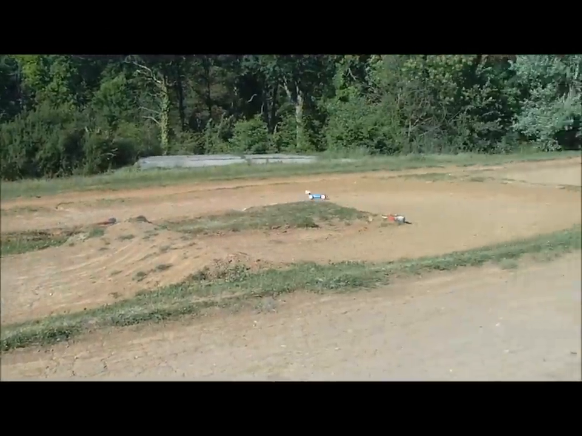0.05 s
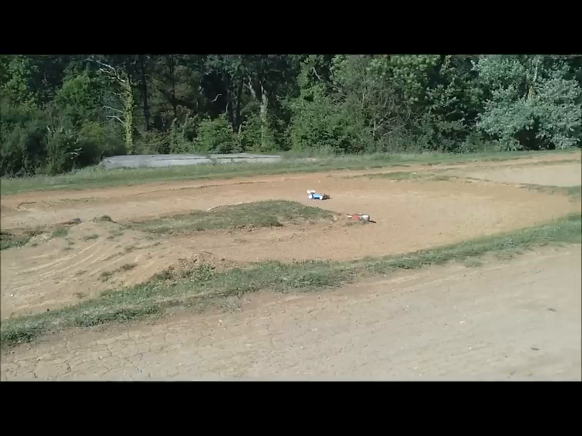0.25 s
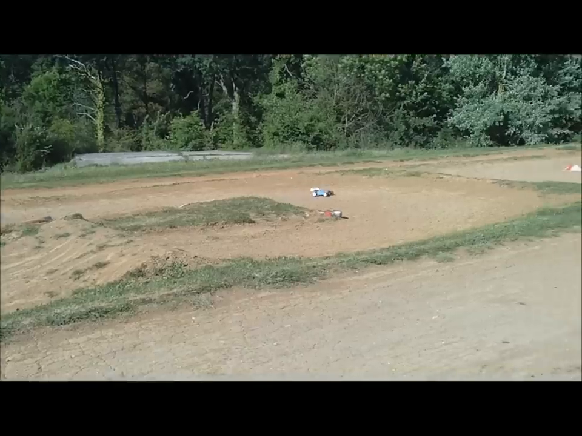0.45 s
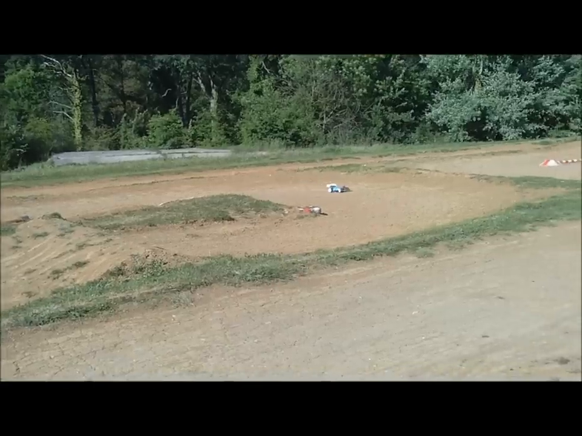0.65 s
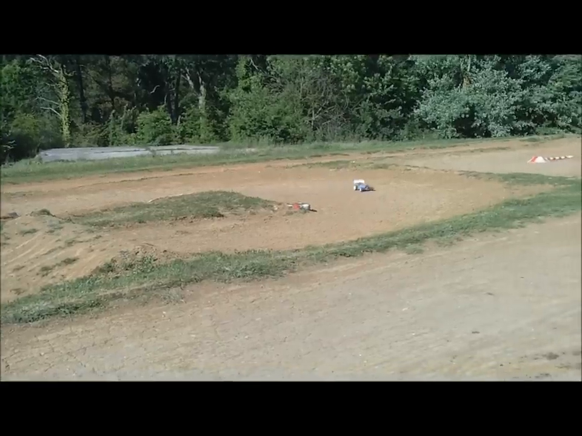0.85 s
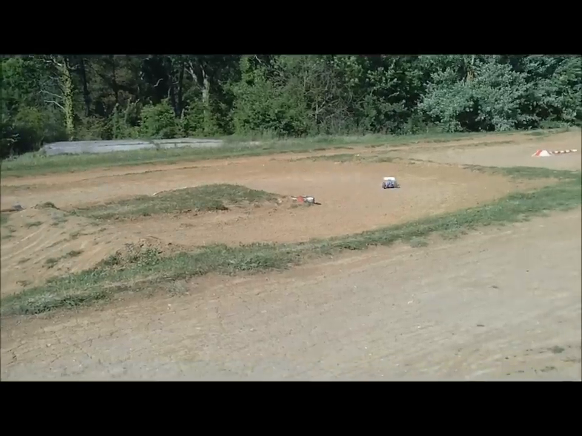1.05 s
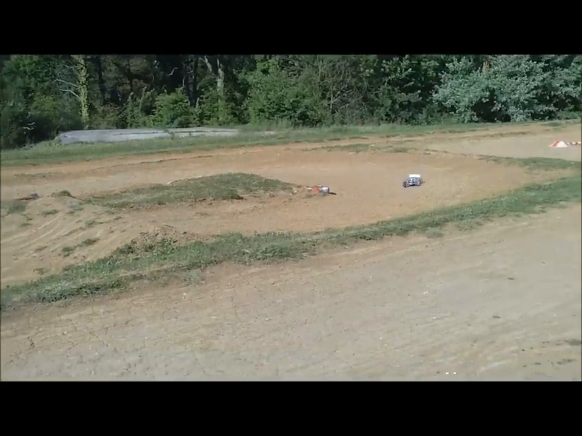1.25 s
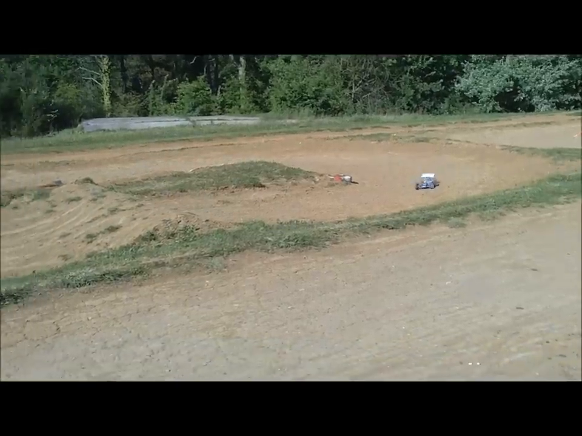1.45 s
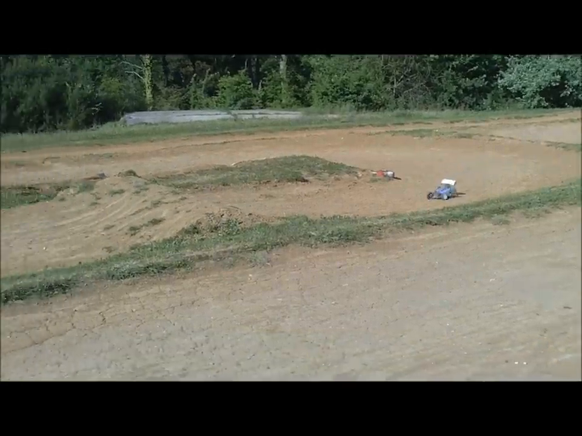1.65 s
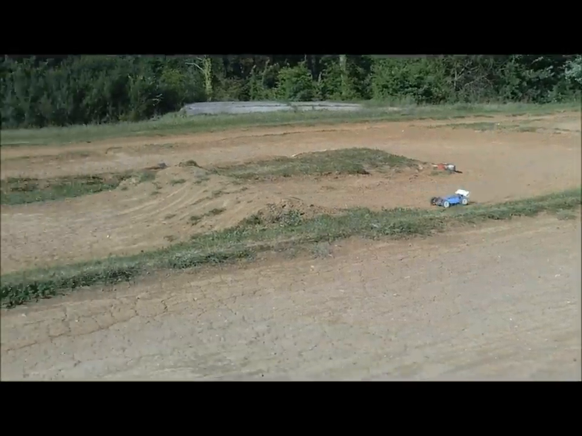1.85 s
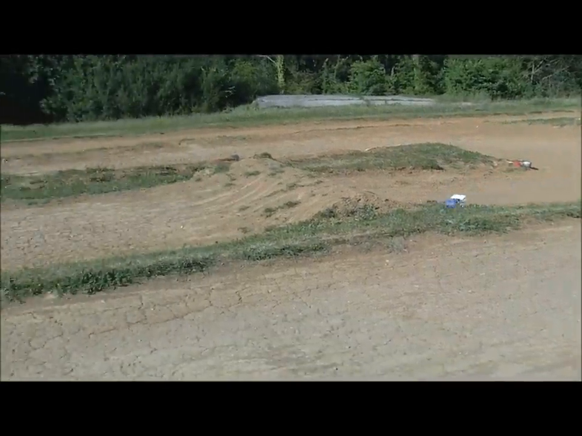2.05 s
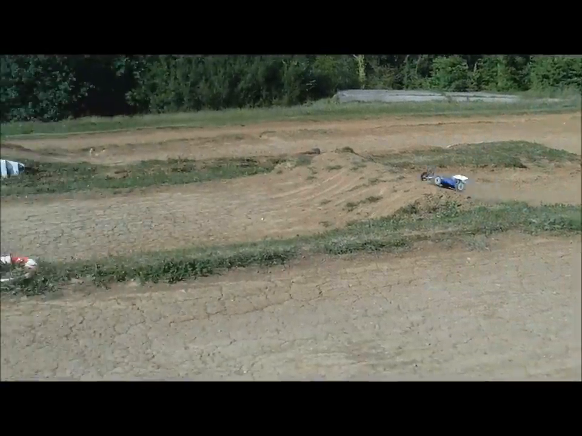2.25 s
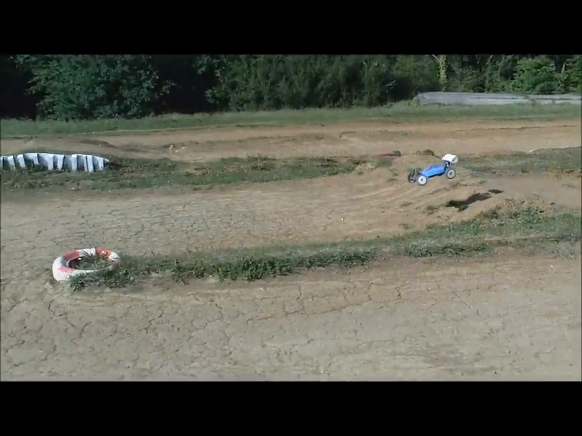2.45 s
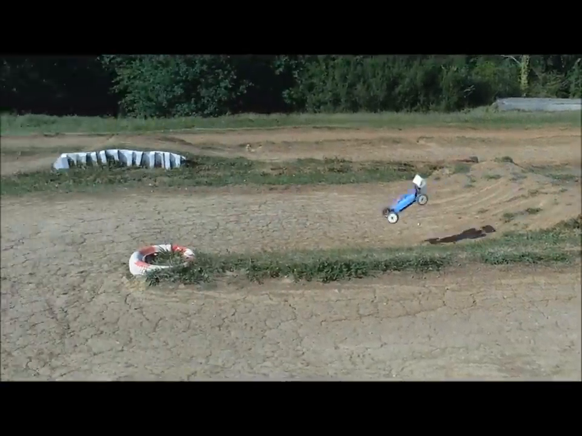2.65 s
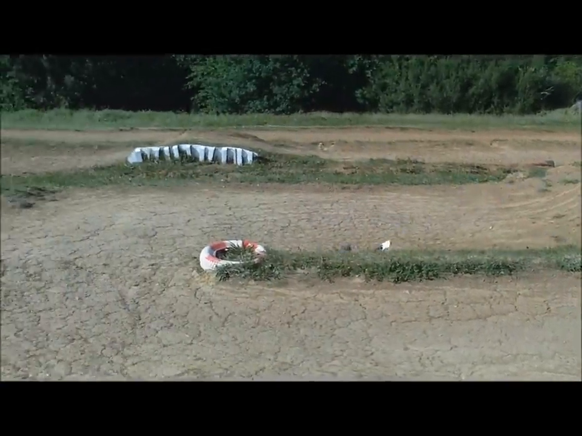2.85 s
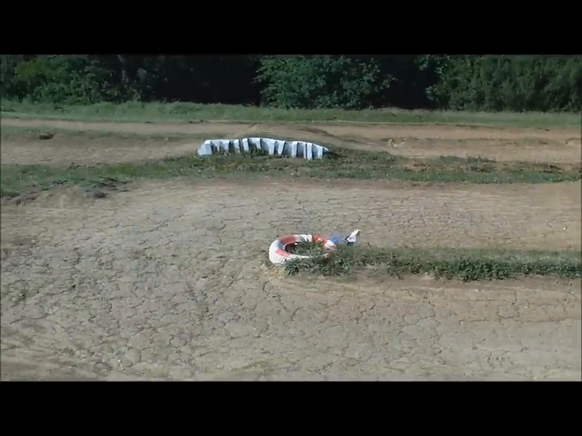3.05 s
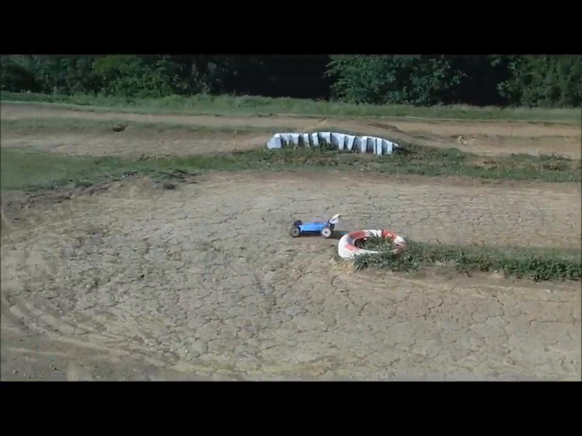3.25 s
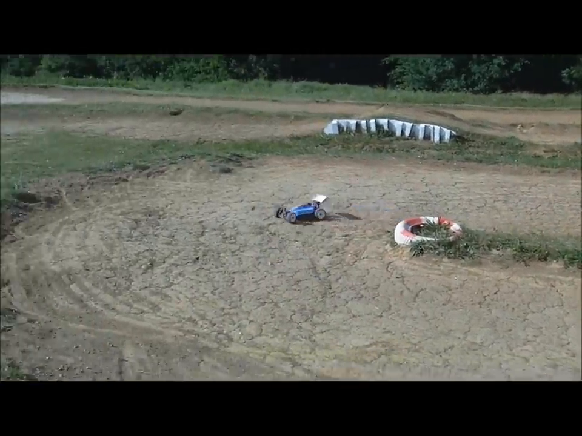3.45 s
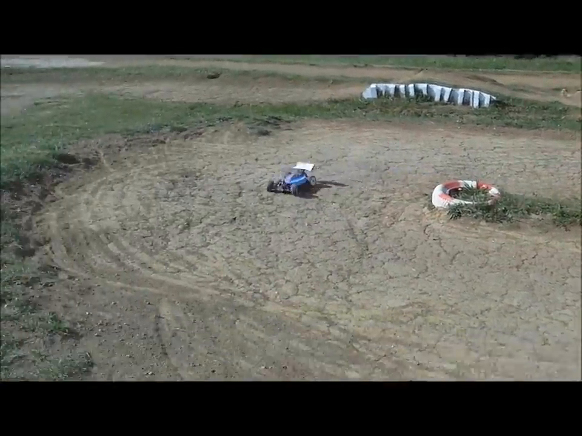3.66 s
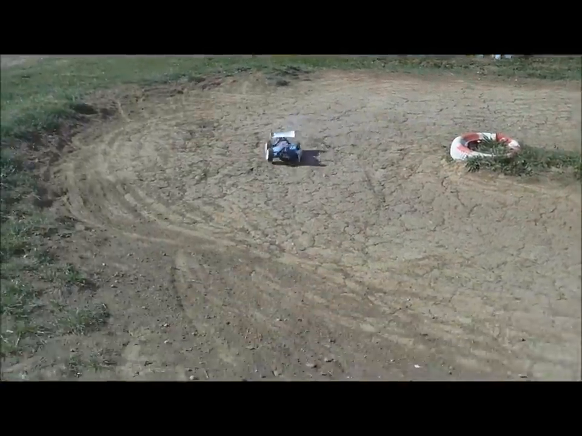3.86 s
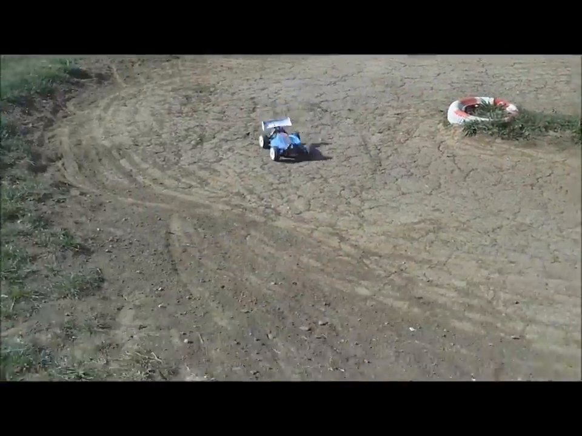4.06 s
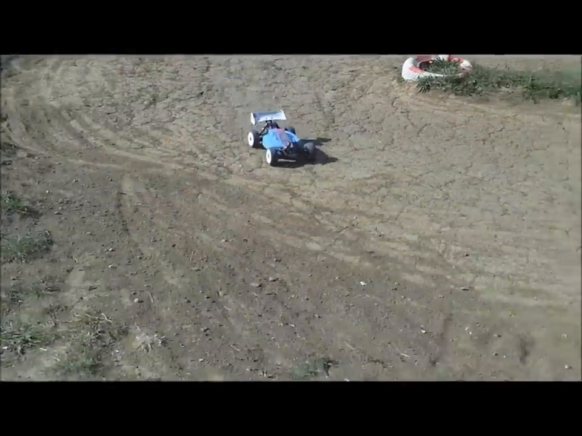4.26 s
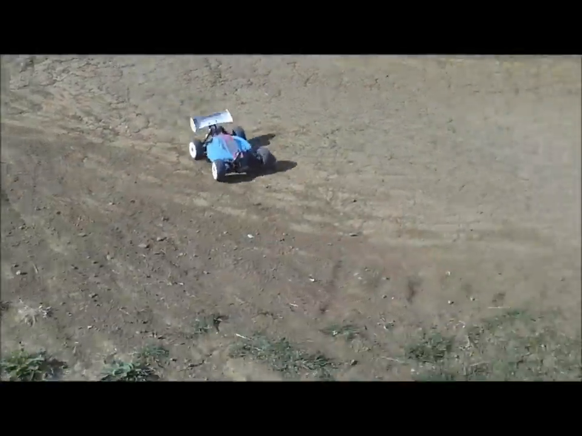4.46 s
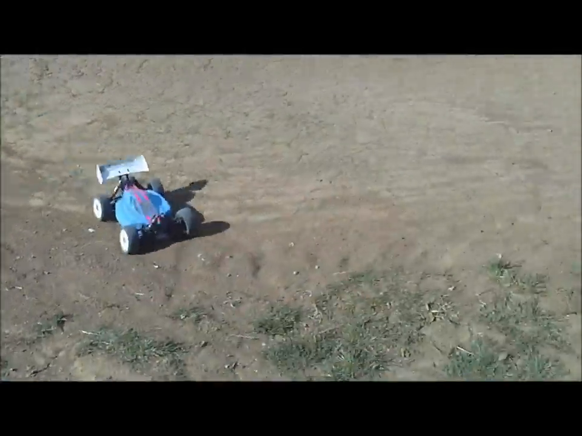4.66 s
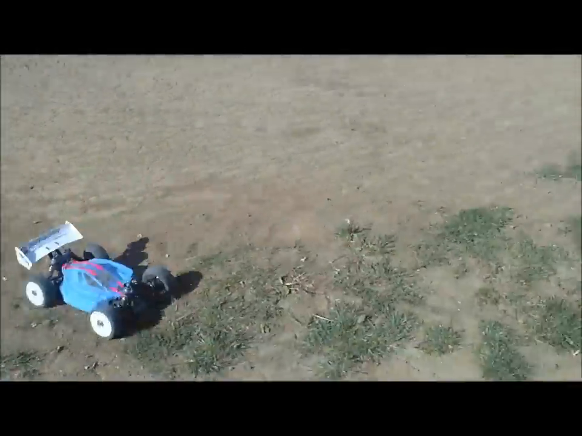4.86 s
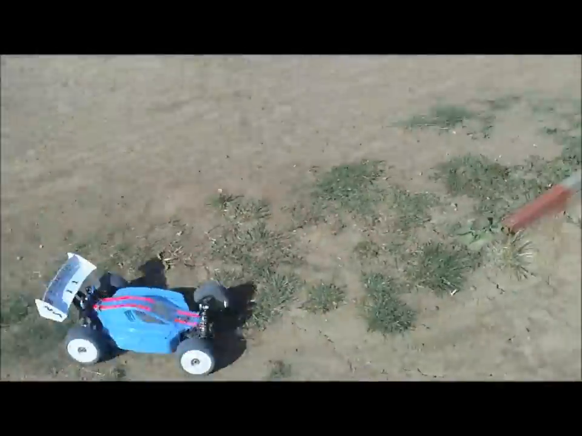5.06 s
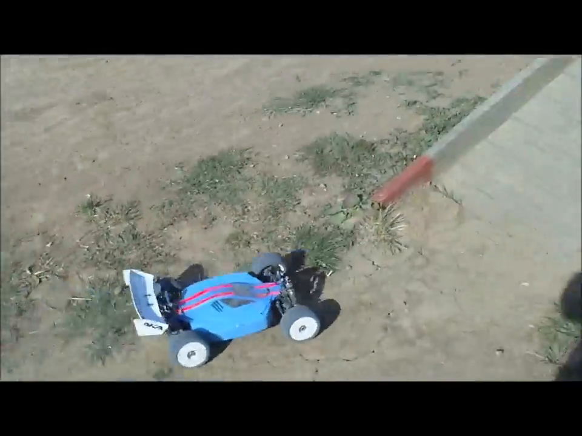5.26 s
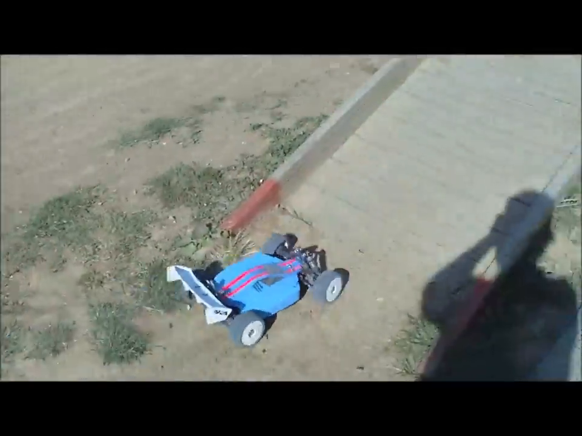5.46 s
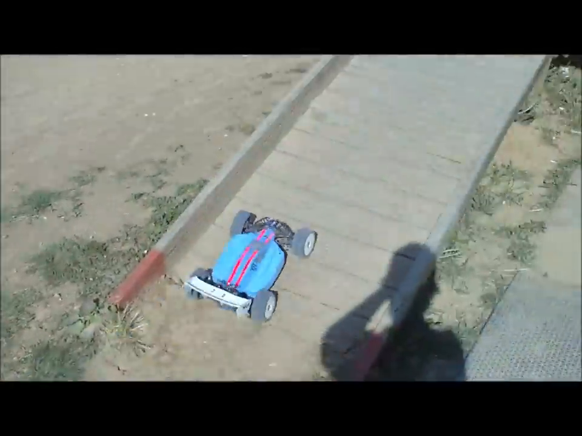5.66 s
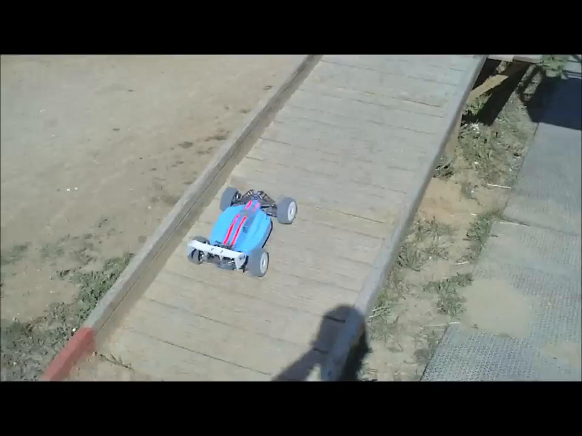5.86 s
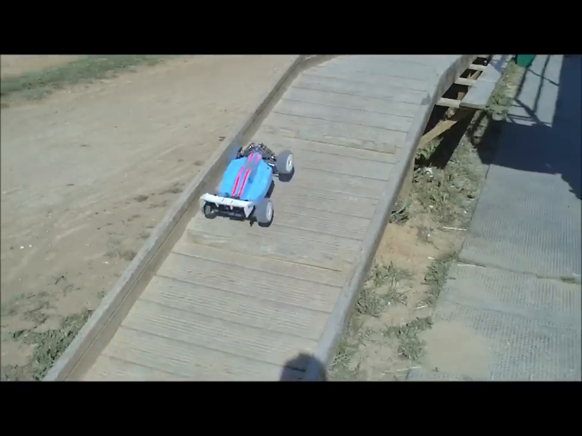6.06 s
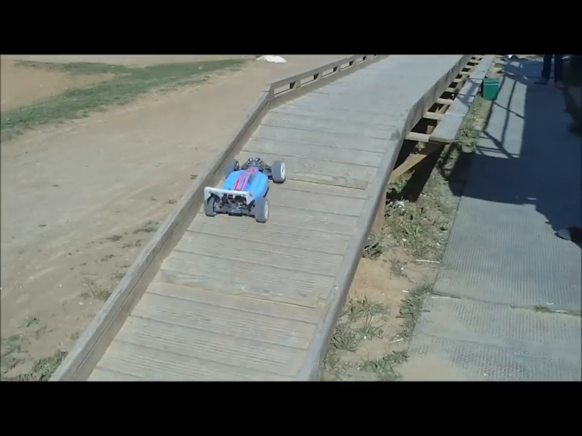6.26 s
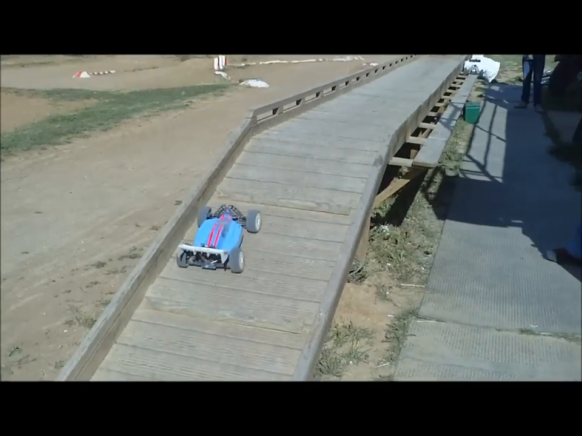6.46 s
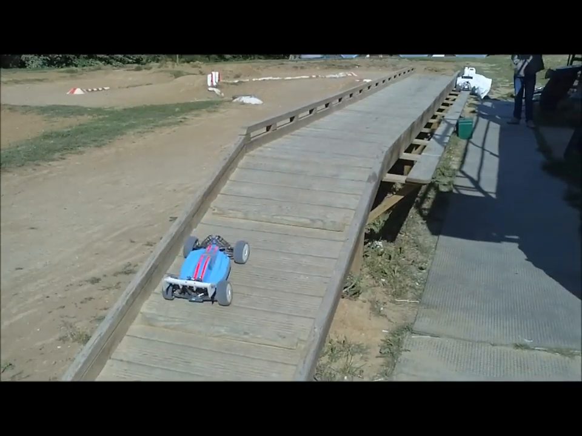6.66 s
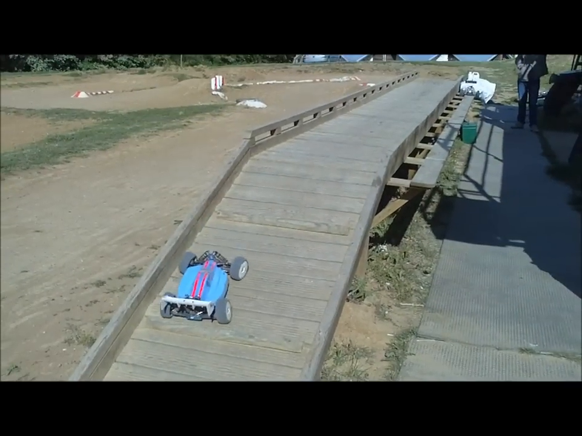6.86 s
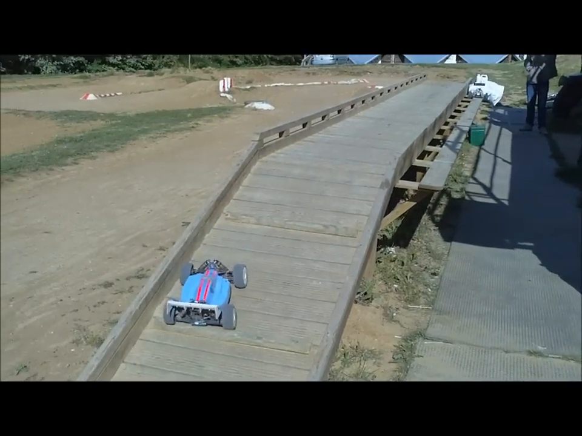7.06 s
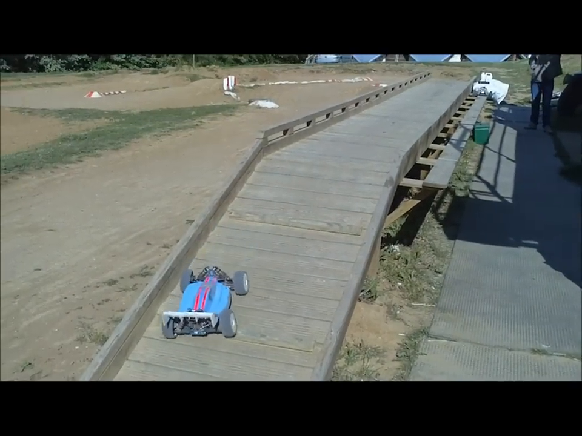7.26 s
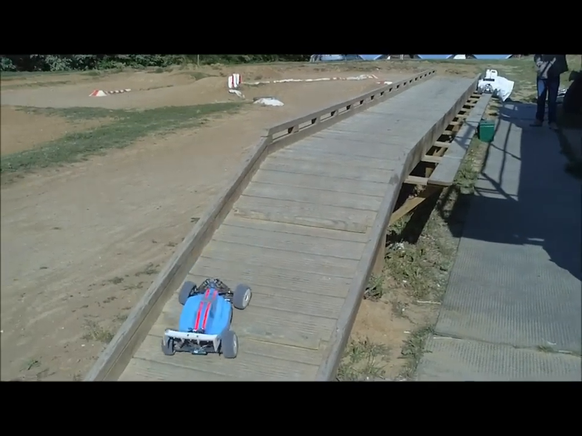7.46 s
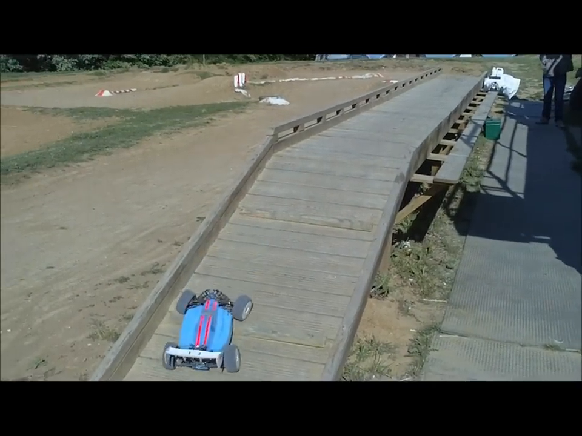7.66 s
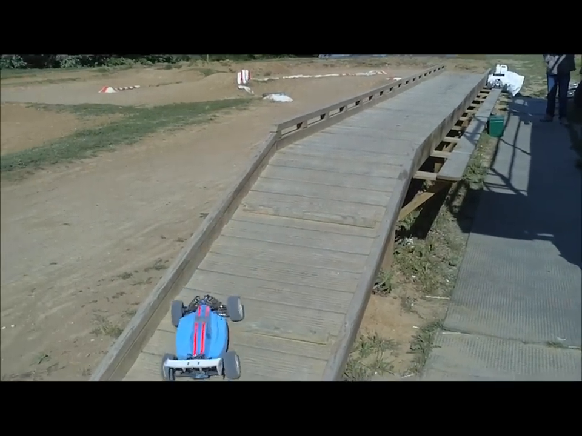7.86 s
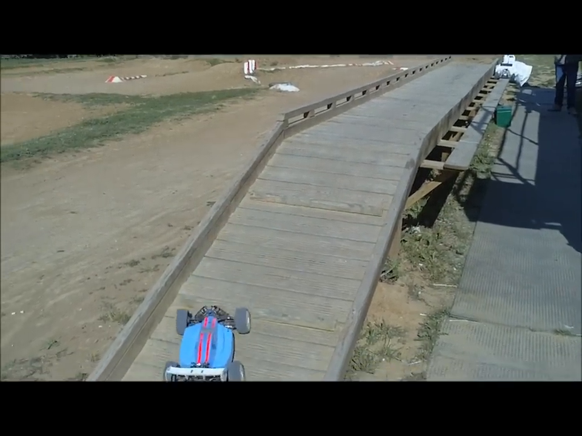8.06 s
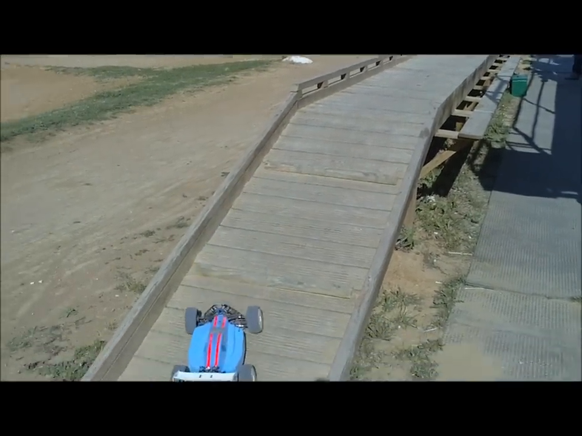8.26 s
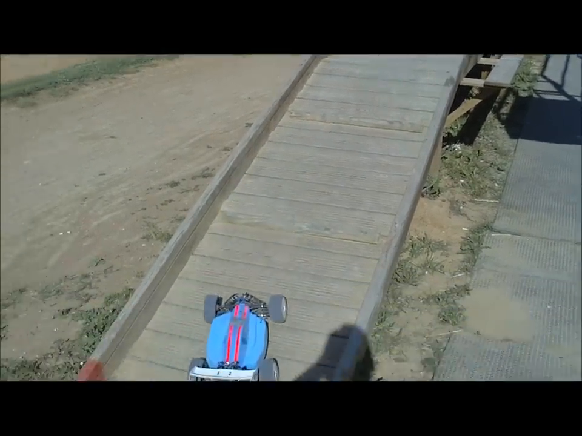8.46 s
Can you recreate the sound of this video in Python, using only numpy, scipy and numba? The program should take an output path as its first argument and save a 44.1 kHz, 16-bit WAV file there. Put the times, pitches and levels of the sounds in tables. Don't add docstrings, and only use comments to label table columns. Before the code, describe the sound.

Outdoors on a dirt track, a small electric toy buggy whines and chatters in short throttle bursts, faint at first, then nearer. Tyres patter on its hollow shell, landings thump, and loose drive parts rattle sharply as it passes close. It clacks hard up a plank ramp, goes quiet, then rolls back with a knock and light ticks. A thin camera microphone with little bass catches distant road hum and a breeze.

```python
import sys
import numpy as np
from scipy import signal
from scipy.fft import rfft, irfft, next_fast_len
from scipy.io import wavfile
from scipy.ndimage import uniform_filter1d, map_coordinates
from numba import njit

SR = 44100
rng = np.random.default_rng(int(sys.argv[2]) if len(sys.argv) > 2 else 0)


def volts_from_db(level):
    exponent = np.asarray(level, float) / 20
    return 10 ** exponent


def transcribe(u):
    v = np.clip(np.atleast_2d(u).T, -1, 1)
    q = np.round(v * 32767).astype(np.int16)
    wavfile.write(sys.argv[1], SR, q)


N = 375291

# [t/s, coasting gears level/dB, coasting shell level/dB, grit rasp re shell/dB]
COASTING = [(0, -59.5, -55, -4.5), (.85, -41.5, -56.5, -0.5), (1.7, -31, -42.5, -4),
            (1.95, -43, -37.5, -5.5), (2.5, -36, -50, 5.5), (3, -42.5, -42, 1), (3.5, -30.5, -35.5, -3.5),
            (4.1, -27.5, -35.5, -0.5), (4.4, -32.5, -38, -4), (4.7, -29, -35, -7), (5.3, -27.5, -34, -7),
            (5.8, -29, -32, -8), (6.3, -33.5, -39.5, -3.5), (7.25, -45, -42, -7.5), (7.75, -49, -43, -13),
            (8.51, -37, -47, -8)]


def level(x, db):
    return x * volts_from_db(db) / np.sqrt(np.mean(x ** 2))


def curves(table):
    s, *columns = np.transpose(table)
    return [np.interp(np.arange(N) / SR, s, c) for c in columns]


def colour(x, points):
    size = next_fast_len(N)
    hz, db = np.transpose(points)
    gain_db = np.interp(np.log(np.arange(size // 2 + 1) * SR / size + 1), np.log(hz), db)
    return irfft(rfft(x, size) * volts_from_db(gain_db), size)[:N]


def ring(x, hz, width_hz):
    return signal.lfilter(*signal.iirpeak(hz, hz / width_hz, fs=SR), x)


@njit
def moving_ring(x, hz, width_hz):
    y, band, low = np.empty(len(x)), 0., 0.
    for i in range(len(x)):
        g, k = np.tan(np.pi * hz[i] / SR), width_hz[i] / hz[i]
        v = (band + g * (x[i] - low)) / (1 + g * (g + k))
        band, low, y[i] = 2 * v - band, low + 2 * g * v, k * v
    return y


def walk(rate_hz):
    k = int(SR / rate_hz)
    return 0.92 * uniform_filter1d(np.repeat(rng.standard_normal(N // k + 1), k), k)[:N]


def clicks(per_s, scatter_db):
    hit = rng.random(N) < per_s / SR
    return hit * rng.standard_normal(N) * volts_from_db(scatter_db * np.minimum(rng.exponential(size=N), 3.5))


def late(x, ms):
    return map_coordinates(x, [np.arange(N) - ms * SR / 1000], order=1)


def swells(s, length_s, db, slope_db, rise_db_s, fall_db_s):
    hop = 32
    t = np.arange(0, N + 2 * hop, hop)[:, None] / SR - s
    held_db = db + slope_db * np.clip(t / length_s, 0, 1)
    event_db = held_db + rise_db_s * np.minimum(t, 0) - fall_db_s * np.maximum(t - length_s, 0)
    return np.interp(np.arange(N), np.arange(len(t)) * hop, volts_from_db(event_db.max(axis=1)))


def throttle():
    # [t/s, length/s, gear
    # chatter level/dB, swell over the blip/dB, shell drone re gears/dB]
    blips = [(0.179, 0.31, -37, 7.5, -9.5), (0.419, 0.085, -28, -4.5, -8.5),
             (0.534, 0.12, -32, 9.5, -14.5), (0.626, 0.17, -24.5, -3.5, -15),
             (0.859, 0.0089, -26.5, -11, -13), (0.922, 0.15, -29, 2, -13.5),
             (1.097, 0.19, -29.5, 6.5, -13.5), (1.29, 0.069, -25.5, 6.5, -12),
             (1.377, 0.15, -19.5, -7.5, -10), (1.54, .11, -26, 4, -12), (1.732, 0.23, -26.5, -14, -3),
             (2.066, 0.16, -39.5, 12, -4), (2.186, 0.15, -27, -5, -10), (2.43, 0.12, -34, -1, -10.5),
             (2.604, 0.053, -32.5, -0.5, -7.5), (2.698, 0.073, -24.5, 3.5, -12),
             (2.783, 0.17, -17, -7, -14), (3.107, 0.18, -39, 15, -12), (3.282, 0.16, -31.5, -1, -7.5),
             (3.46, 0.06, -23, -1, -11), (3.619, 0.062, -29.5, 11.5, -11.5),
             (3.699, 0.069, -17.5, -4, -10.5), (3.815, 0.26, -20.5, 3, -12.5),
             (4.159, 0.057, -23, 7, -11.5), (4.211, 0.11, -16.5, -5.5, -9),
                  (4.402, 0.027, -22, -3.5, -8), (4.475, 0.085, -18.5, 0, -11), (4.581, .3, -28, -3, -10),
                  (4.918, 0.035, -22.5, -2.5, -9), (5.064, 0.066, -24, 3, -10), (5.17, 0.12, -21, 1, -9),
                  (5.431, 0.087, -24, 0, -5), (5.616, 0.034, -24, 12, -11), (5.66, 0.13, -17, -2.5, -11),
                  (5.8, 0.054, -28, -1, -7), (5.865, 0.053, -21.5, 9, -11), (5.94, 0.2, -15.5, -7, -10),
                  (6.16, 0.091, -24, -1, -12), (6.274, 0.004, -13, -9, -19), (6.298, 0.091, -19.5, -10, -3),
                  (6.45, 0.081, -28.5, 3, -4), (6.549, 0.52, -29.5, -11, -3), (7.398, 0.11, -36.5, 6.5, 2),
                  (7.519, 0.197, -31, -5, 0.5), (7.8, 0.41, -36, -0.5, -1.5), (8.164, 0.28, -35, 3, -2.5),
                  (8.41, 0.37, -29, 6, -6.5)]
    s, length_s, gear_db, swell_db, shell_db = np.transpose(blips)
    bite_db_s, lift_db_s = 999, 598.5
    return [swells(s, length_s, gear_db + d, swell_db, bite_db_s, lift_db_s) for d in (0, shell_db)]


def gears(load):
    # [t/s, tooth rate f/Hz, whine re chatter/dB]
    mesh = [(0, 3630, -21), (.45, 5600, -16), (.7, 3500, -14), (1.05, 4100, -6), (1.35, 5810, -11.5),
            (2.1, 3570, -23), (3.0, 6150, -18), (3.3, 3800, -7.5), (3.83, 3900, -23), (3.94, 6900, -13),
            (4.25, 6580, -14), (4.75, 4830, -6.5), (5.45, 3464, -17.5), (6.3, 3820, -7.5), (6.6, 3060, -10),
            (7.45, 2740, -9), (8.36, 2870, -8), (8.51, 2900, -7)]
    # [f/Hz, width/Hz, level/dB]
    parts = [(2410, 300, -2), (2990, 256, 3.5), (3510, 550, 2), (4140, 330, 1.5), (4690, 220, 4),
             (4960, 210, 0.5), (5764, 530, 0.5), (6190, 280, 3), (6750, 340, -1)]
    # [f/Hz, density/dB per Hz]
    spectrum = [(880, -40), (1500, -10), (1740, -4.5), (2040, -8.5), (2310, -4.5), (3650, -1), (4340, -3),
                (6070, -3), (7150, -3.5), (7710, -15.5), (10000, -54), (17000, -120)]
    pinion_teeth, whine_width_hz = 24, 220.
    mesh_hz, whine_db = curves(mesh)
    turn = np.cos(2 * np.pi * np.cumsum(mesh_hz / pinion_teeth) / SR)
    teeth = clicks(per_s=9000., scatter_db=1.5) * (1 + 0.069 * turn)
    chatter = 1.4 * teeth
    for k, (hz, width_hz, db) in enumerate(parts):
        hits = np.roll(teeth, 500 * k)
        chatter = chatter + ring(hits, hz, width_hz) * volts_from_db(db + 4.03 * walk(40.))
    chatter = level(colour(chatter, spectrum), 0)
    wander_hz = mesh_hz * (1 + 0.022 * walk(55.))
    whine = moving_ring(rng.standard_normal(N), wander_hz, np.full(N, whine_width_hz))
    whine = level(whine, 0) * volts_from_db(whine_db + 3.75 * walk(30.))
    drive = np.hypot(load, volts_from_db(curves(COASTING)[0]))
    return (chatter + whine) * drive * volts_from_db(2.1 * walk(110.) - 1.9)


def sings():
    # [t/s, peak level/dB, f/Hz]
    tones = [(0.55, -35, 2930), (0.784, -28, 4240), (0.791, -24, 3490), (0.86, -32, 3450),
             (0.863, -42, 6480), (0.99, -29.5, 1630), (1.208, -23, 4250), (1.21, -26, 3050),
             (1.23, -27, 5000), (1.339, -21, 6500), (1.368, -16.5, 6200), (1.408, -29, 2980),
             (1.459, -23, 2990), (1.591, -27, 4980), (1.649, -28, 2960), (1.653, -24, 6360),
             (1.732, -25, 3030), (1.809, -27, 1490), (2.463, -27, 3580), (2.505, -39, 3630),
             (2.505, -26.5, 1465), (2.541, -27.5, 3050), (2.638, -29, 6030), (2.714, -29, 3100),
             (2.716, -24, 6750), (2.716, -36, 3720), (2.792, -20, 3600), (2.81, -28, 6130),
             (2.852, -17, 3540), (3.127, -31, 3000), (3.129, -27, 1500), (3.267, -34, 6300),
             (3.276, -21.5, 3760), (3.318, -24, 2990), (3.467, -33, 3960), (3.468, -23, 6280),
             (3.512, -25, 6140), (3.514, -24, 3270), (3.563, -27.5, 4640), (3.692, -22, 4600),
             (3.693, -23, 2390), (3.706, -21, 6200), (3.708, -26, 5800), (3.735, -26, 1520),
             (3.741, -19, 3070), (3.804, -26, 1640), (3.81, -28, 3120), (3.86, -17.5, 3060),
             (3.889, -21, 2940), (3.897, -17, 3720), (3.918, -21, 3070), (3.926, -17, 6130),
             (3.955, -18, 1720), (3.962, -16, 3140), (4.018, -16.5, 1700), (4.025, -20, 3240),
             (4.071, -23, 1690), (4.074, -17, 3140),
             (4.18, -20, 4920), (4.187, -23, 1780), (4.194, -20, 3320), (4.261, -25, 3190),
                  (4.267, -17, 6600), (4.288, -26, 3300), (4.414, -29, 3450), (4.49, -14, 5240),
                  (4.491, -17, 6300), (4.552, -16, 6180), (5.193, -16, 5900), (5.191, -19, 2300),
                  (5.191, -17.5, 4570), (5.194, -33, 3800), (5.217, -18, 2360), (5.239, -23, 2360),
                  (5.428, -24, 5780), (5.456, -17.5, 6700), (5.462, -17, 3380), (5.485, -27, 5650),
                  (5.512, -24, 3250), (5.625, -21, 5800), (5.647, -14, 5940), (5.654, -12, 3680),
                  (5.689, -15, 3760), (5.72, -14.5, 6430), (5.751, -22, 3610), (5.759, -23, 2900),
                  (5.772, -16, 3680), (5.774, -20, 5640), (5.776, -17, 2800), (5.823, -23, 2820),
                  (5.886, -18, 2780), (5.911, -21, 6680), (5.932, -12, 3630), (5.954, -22, 6150),
                  (5.954, -13, 4070), (5.971, -14, 5980), (5.98, -31, 2860), (5.991, -20, 3140),
                  (5.995, -16, 6750), (6.052, -16, 2820), (6.066, -17, 3820), (6.071, -14.5, 2990),
                  (6.189, -21, 4890), (6.303, -14, 3020), (6.319, -17, 4020), (6.389, -25, 3020),
                  (6.549, -36, 6360), (6.563, -26, 3150), (6.807, -32, 3200), (7.07, -35, 4150),
                  (7.526, -24, 2740), (7.576, -26, 2730), (7.632, -35, 2760), (7.693, -31, 2820),
                  (7.833, -33, 2800), (8.18, -37, 2850)]
    half_length_s, blur = 0.0036, 0.21
    out, t = np.zeros(N), np.arange(-1024, 1024) / SR
    rows = tones
    shakes = uniform_filter1d(rng.standard_normal((len(rows), len(t))), size=64, axis=1) * 8
    for (s, db, hz), shake in zip(rows, shakes):
        tone = np.sin(2 * np.pi * hz * t + 1.7 * blur * shake)
        tone = tone * (1 + blur * shake[::-1])
        i = int(s * SR) - len(t) // 2
        out[i:i + len(t)] += volts_from_db(db) * tone * np.exp(-.5 * (t / half_length_s) ** 2)
    return out


def rolling(load):
    # [t/s, shell boom level/dB, suspension thump level/dB]
    jolts = [(1.65, -28.5, -56), (1.88, -37, -44), (2.2, -33, -39), (2.84, -46.5, -40), (2.91, -25.5, -36),
             (2.947, -24, -43), (3.74, -32, -47), (3.97, -25.5, -50), (4.04, -26, -48), (4.54, -28, -53),
             (4.73, -40, -59), (5.2, -43, -37.5), (5.7, -30, -41), (5.98, -34, -34), (6.03, -23, -45),
             (6.07, -19.5, -27.5), (6.31, -22, -28.5), (7.368, -31, -34), (7.49, -39, -41), (7.6, -40, -38),
             (7.8, -48, -39), (7.99, -56, -45), (8.225, -29.5, -54), (8.28, -36, -52), (8.49, -39, -61)]
    # [f/Hz, width/Hz, level/dB]
    shell = [(740, 170, -4), (920, 434, 7), (1070, 240, -6.5)]
    # [t/s, level re shell/dB]
    planks = [(0, -18), (4.5, -10), (5.8, -11), (7.4, -9), (8.1, -12), (8.25, 0), (8.51, -4)]
    plank_hz, plank_width_hz, spring_db = 1060, 150, -17.5
    coast_db, rasp_db = curves(COASTING)[1:]
    s, boom_db, thump_db = np.transpose(jolts)
    boom, jolt = (swells(s, 0.0049, db, 0, rise_db_s=330, fall_db_s=273.5) for db in (boom_db, thump_db))
    roll = np.hypot(load, volts_from_db(coast_db))

    pins = clicks(per_s=3500., scatter_db=1.53)
    drone = 0
    for hz, width_hz, db in shell:
        mode = ring(ring(pins, hz, width_hz), hz, 1.7 * width_hz)
        drone = drone + volts_from_db(db + 2 * walk(25.)) * mode
    hollow = ring(ring(pins, plank_hz, plank_width_hz), plank_hz, 2 * plank_width_hz)
    drone = level(drone, 0) + level(hollow, 0) * volts_from_db(curves(planks)[0])
    rasp = ring(ring(np.roll(pins, 977), 1700.0, 740.0), 1620., 900.) * volts_from_db(3.0 * walk(30.))
    thump = ring(ring(clicks(per_s=750.0, scatter_db=3.0), 409.0, 120.0), 540.0, 330.0)

    mix = level(drone, -0.44) * np.hypot(roll, boom)
    mix = mix + level(rasp, 0) * volts_from_db(rasp_db) * np.hypot(roll, 0.12 * boom)
    mix = mix + level(thump, 0) * np.hypot(roll * volts_from_db(spring_db), jolt)
    return mix * volts_from_db(0.13 * walk(30.))


def lope():
    # [t/s, length/s, beat rate f/Hz, depth/dB]
    beats = [
        (2.422, .26, 30.5, 2),
        (3.86, 0.17, 28, 0.5),
        (4.57, 0.5, 48, 0.5),
        (5.882, 0.23, 45, -0.5),
        (7.426, 1.1, 24, 1.5),
    ]
    t, db = np.arange(N) / SR, 0
    for s, length_s, beat_hz, depth_db in beats:
        beat = np.cos(2 * np.pi * beat_hz * (t - s) + 1.6 * walk(8.2))
        db = db + depth_db * beat * np.clip(np.minimum(t - s, s + length_s - t) / 0.076, 0, 1)
    return volts_from_db(db)


def knocks():
    # [t/s, peak level/dB, f/Hz]
    slack = [(1.207, -22, 3070), (1.543, -18, 3000), (1.728, -13, 3050), (2.432, -10, 3680),
             (2.462, -17, 3530), (2.5, -13, 3710), (2.713, -15, 3100), (2.752, -14, 5170),
             (3.462, -10, 3130), (3.561, -14.5, 3020), (4.159, -20.5, 5480), (5.099, -4, 4600),
             (5.189, -2, 4590), (5.216, -6.5, 2370), (5.425, -16, 3670), (5.457, -2, 3340),
             (5.48, -7.5, 5630), (5.614, -10, 5760), (5.862, -23, 4150), (5.883, -9, 2780),
             (5.905, -5.5, 3600), (5.93, 0.5, 3560), (6.134, -7.5, 3900), (6.162, -18, 4840),
             (6.185, -11.5, 4960), (6.224, -13, 3600), (6.253, -8, 3060), (6.291, -5, 3800)]
    # [t/s, peak level/dB, f/Hz]
    stones = [(.547, -25, 780), (2.149, -32, 970), (2.18, -15.5, 1520), (3.126, -17, 1470),
              (4.356, -17, 1090), (4.393, -19.5, 1700), (5.344, -27, 1070), (6.037, -4, 960),
              (6.301, -7, 820), (6.443, -25, 1070), (7.413, -21, 1020), (7.488, -23, 982),
              (8.069, -27, 1030), (8.213, -20, 1060), (8.267, -24, 1070)]
    # [t/s, peak level/dB, f/Hz]
    rattle = [(4.591, -14, 4050), (4.625, -8, 3640), (4.641, -10, 4820), (4.668, -26, 5050),
              (4.712, -6, 3840), (4.731, -9.5, 1030), (4.75, -7, 5120), (4.774, -17, 3630),
              (4.791, -6, 3840), (4.81, -3, 4600), (4.828, -10.5, 2900), (4.83, -12, 1015),
              (4.85, -9, 3880), (4.865, -15, 5000), (4.889, -10, 5000), (4.948, -16, 4500),
              (5.027, -9, 3500), (5.046, -6.5, 3510), (5.059, -11, 3420), (5.072, -13, 4550),
              (5.081, -8, 4800), (5.089, -9, 4800), (5.106, -4, 4730), (5.155, -10, 4820),
              (5.342, -19, 3500), (5.353, -11, 3500), (6.072, -7, 987), (7.435, -19, 1060),
              (7.93, -17, 2700), (8.001, -15, 2780), (8.04, -23, 2710), (8.07, -15, 6000),
              (8.102, -18, 2850), (8.127, -16, 950)]
    # [t/s, peak level/dB, f/Hz]
    clacks = [
        (4.394, -9, 4560),
        (4.4855, -4, 4920),
        (4.467, -11, 4500),
        (6.2695, -3, 3970),
        (6.2715, 3, 3600),
        (6.276, -4, 4600),
    ]
    # [t/s, peak level/dB, f/Hz]
    edges = [
        (6.1022, -2, 1114),
        (6.1035, -6, 2700),
        (7.3601, -11, 3000),
        (7.3618, -10, 1300),
        (7.3673, 1, 1800),
        (7.3676, -2, 1000),
        (7.3732, -7, 1150),
    ]
    kinds = [(slack, (-25, .03, .6, .002)),
             (stones, (-9.5, .006, 0, .0012)),
             (rattle, (-13, .006, .8, .2)),
             (clacks, (-22, .04, .9, .0002)),
             (edges, (-7, .016, .25, .0002))]
    out, t = np.zeros(N), np.arange(2048) / SR
    blows = [(*row, *kind) for rows, kind in kinds for row in rows]
    cracks = rng.standard_normal((len(blows), len(t)))
    for (s, db, hz, clack_db, t60_s, broad, rise_s), crack in zip(blows, cracks):
        crack = crack * np.exp(-np.log(1000) * t / max(t60_s, .006)) * np.minimum(t / rise_s, 1)
        crack = crack + 0.45 * np.exp(-((t - rise_s) / .00006) ** 2)
        part = ring(crack, hz, 0.18 * hz)
        part = part + broad * 0.14 * ring(ring(crack, 3800.0, 4100.0), 4500., 5000.)
        clack = ring(ring(crack, 760.0, 300.), 760., 600.) + 2.5 * ring(crack, 1750., 500.)
        blow = part / np.abs(part).max() + volts_from_db(clack_db) * clack / np.abs(clack).max()
        i = int((s - .0002) * SR)
        out[i:i + len(t)] += (volts_from_db(db - 4.5) * blow)[:N - i]
    return signal.sosfilt(signal.butter(2, 330., "high", fs=SR, output="sos"), out)


def reflected(buggy):
    # [t/s, echo lag/ms, echo share/0-1, later echo share/0-1]
    bearing = [(0, 1.38, 0.3, 0.2), (1, 1.36, 0.46, 0.28), (2.1, 1.295, 0.29, 0.23),
               (2.55, 1.37, 0.48, 0.27), (2.75, 1.28, 0.46, 0.17), (3.2, 1.244, 0.37, 0.2),
               (3.9, 1.22, 0.36, 0.04), (4.3, 1.15, 0.3, 0), (4.7, 0.99, 0.22, 0.02), (5.25, 0.77, 0.01, 0),
               (5.6, 1.08, 0.11, 0.1), (5.85, 1.04, 0.44, 0.22), (6.1, 1.22, 0.26, 0.01),
               (6.55, 1.2, 0.28, 0.06), (7.1, 1.2, 0.13, 0), (7.45, 1.07, 0.15, 0.07),
               (8.25, 1.07, 0.2, 0.22), (8.51, 0.95, 0.34, .01)]
    edge_lag_ms = .47
    lag_ms, share, edge_share = curves(bearing)
    lag_ms = lag_ms * (1 + 0.012 * walk(5.))
    dull = signal.lfilter(*signal.butter(1, 6000., fs=SR), buggy)
    echoes = share * late(dull, lag_ms) - edge_share * late(dull, lag_ms + edge_lag_ms)
    return (buggy + 1.03 * echoes) / np.sqrt(1 + share ** 2 + edge_share ** 2)


def engine():
    # [t/s, firing tone f/Hz, level/dB]
    pulls = [
        [(2.4, 113, -77), (3.0, 128.3, -72.5), (3.6, 151, -76)],
        [(4.3, 120, -72), (4.6, 132, -74.5), (5.14, 147.6, -65), (5.57, 162, -64), (5.9, 178, -71)],
    ]
    out, t = 0, np.arange(N) / SR
    for pull in pulls:
        hz, db = curves(pull)
        fade = np.clip(np.minimum(t - pull[0][0], pull[-1][0] - t) / .15, 0, 1)
        phase = 2 * np.pi * np.cumsum(hz) / SR
        tone = np.sin(phase) + volts_from_db(-8.5) * np.sin(phase / 2)
        out = out + np.sqrt(2) * fade * volts_from_db(db + 2.5 + 0.69 * walk(14.)) * tone
    return out


def breeze():
    # [t/s, level/dB]
    steady = [(0, -80.5), (2.8, -68.5), (5.3, -68), (7.2, -60), (8.51, -67)]
    # [t/s, peak level/dB]
    gusts = [(2.92, -62), (3.66, -53), (3.74, -58.5), (4.04, -50.5), (4.35, -56), (5.05, -54.5),
             (5.65, -48.5), (6.12, -53), (6.3, -63), (6.7, -48.5), (6.93, -53), (7.37, -49.5),
             (7.55, -46.5), (7.75, -52.5), (7.92, -46.5), (8.22, -52)]
    # [t/s, peak level/dB]
    puffs = [(3.611, -33), (4.031, -26), (4.22, -33), (4.321, -35), (5.968, -58), (6.067, -42),
             (6.296, -23.5), (6.684, -28), (6.724, -26.5), (6.921, -26), (7.367, -27), (7.508, -40),
             (7.634, -40)]
    # [f/Hz, density/dB per Hz]
    rumble = [(18, -64.5), (30, -19.5), (59, -12.5), (157, -8.5), (300, -5), (390, -23.5), (660, -120)]
    flutter = colour(rng.standard_normal(N) * volts_from_db(3.0 * walk(23.0)), rumble)
    push = np.zeros(N)
    s, db = np.transpose(puffs)
    push[(s * SR).astype(int)] = volts_from_db(db + 34.5)
    s, db = np.transpose(gusts)
    gust = swells(s, .02, db, 0, rise_db_s=146.5, fall_db_s=87.5)
    blow = np.hypot(volts_from_db(curves(steady)[0]), gust)
    return level(flutter, 0.37) * blow + ring(ring(push, 270.0, 150.), 250., 300.)


def road_hum():
    # [f/Hz, density/dB per Hz]
    spectrum = [(18, -66), (30, -46), (248, -19.5), (404, -8.5), (546, -4.5), (932, 4.5), (2410, -9.5),
                (2910, -3.5), (6110, -8.5), (7190, -8.5), (7710, -64), (10000, -101), (17000, -120)]
    return level(colour(rng.standard_normal(N), spectrum), -40) * volts_from_db(1.5 * walk(3.))


def scene():
    gear_load, shell_load = throttle()
    buggy = (gears(gear_load) + rolling(shell_load)) * lope() + knocks()
    return (reflected(buggy) + sings() + road_hum() + breeze() + engine())[None]


def gate(x):
    count, near_db, treble_db = 6, -5.0, -11.5
    hz, _, spec = signal.stft(x, SR, nperseg=2048)
    bins = spec[:170 * count]
    power = (np.abs(bins) ** 2).reshape(-1, count, spec.shape[1]).mean(axis=1)
    near = np.exp(uniform_filter1d(np.log(power + 1e-18), size=7, axis=0))
    band_hz = hz[:len(bins):count, None]
    treble = power[(band_hz[:, 0] > 2000) & (band_hz[:, 0] < 6500)].mean(axis=0)
    treble = treble ** .62 * treble.mean() ** .38
    power = power * volts_from_db(2.6 * rng.standard_normal(power.shape))
    keep = (power > near * volts_from_db(near_db) ** 2) | (band_hz < 1100)
    keep &= (power > treble * volts_from_db(treble_db) ** 2) | (band_hz < 6300)
    bins *= np.repeat(keep, count, axis=0)
    return signal.istft(spec, SR, nperseg=2048)[1][:N]


def band_limit(x):
    return signal.sosfilt(signal.butter(12, 7860, fs=SR, output="sos"), x)


def record(dry):
    ceiling, bass_hz, top_hz = 1.0, 150., 7110
    rounded = dry[0] / (1 + (dry[0] / ceiling) ** 4) ** (1 / 4)
    thin = signal.lfilter(*signal.butter(1, bass_hz, "high", fs=SR), rounded)
    cut = signal.sosfilt(signal.butter(7, top_hz, fs=SR, output="sos"), thin)
    finished = gate(cut)[None]
    return band_limit(finished)


dry = scene()
out = record(dry)
transcribe(out)
```